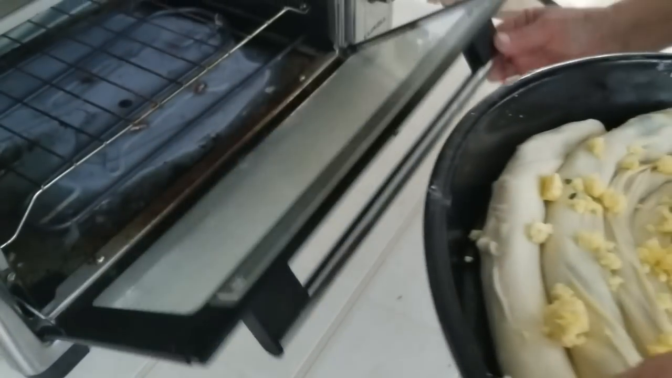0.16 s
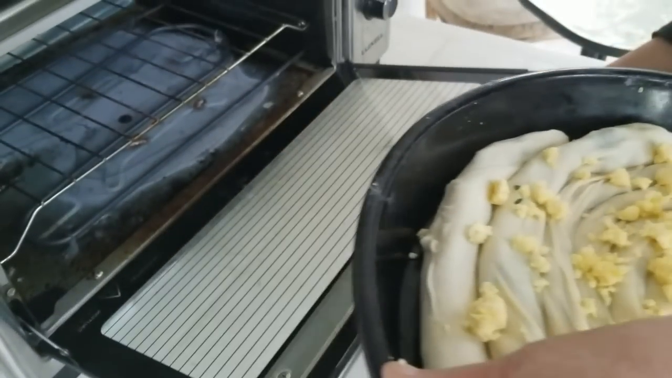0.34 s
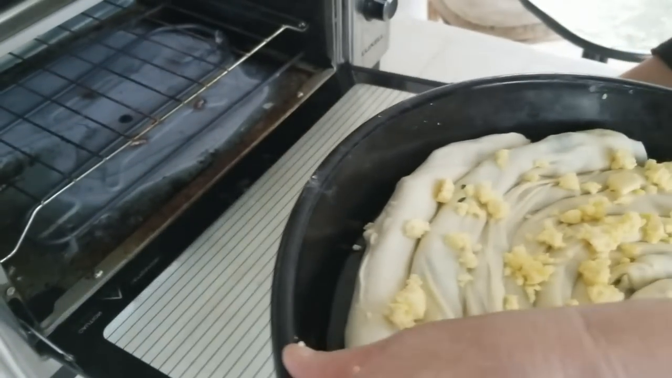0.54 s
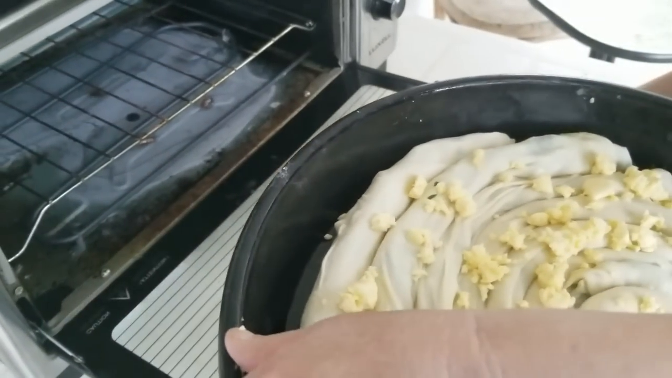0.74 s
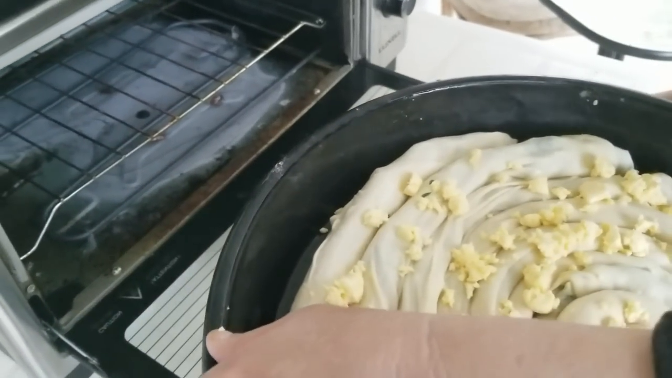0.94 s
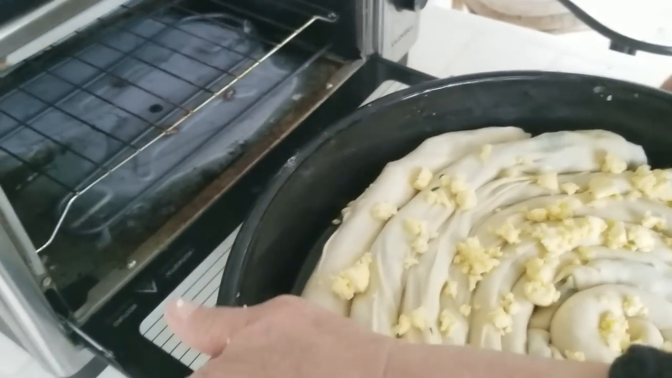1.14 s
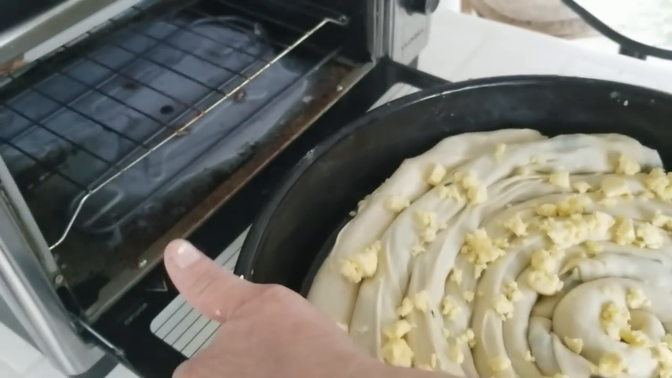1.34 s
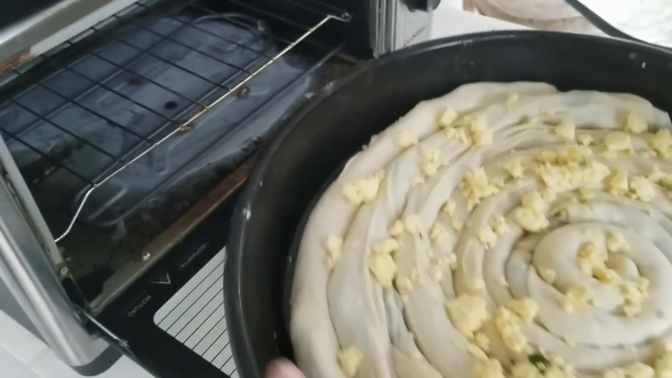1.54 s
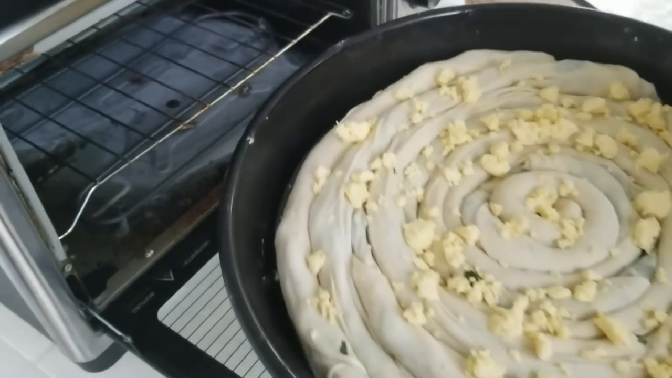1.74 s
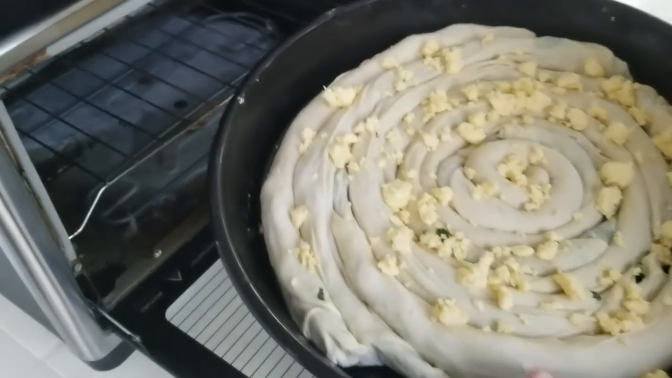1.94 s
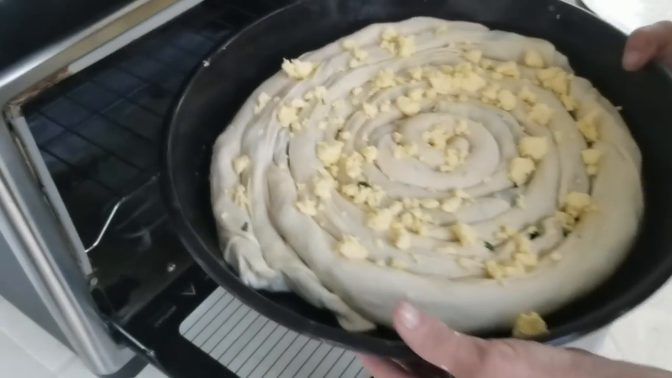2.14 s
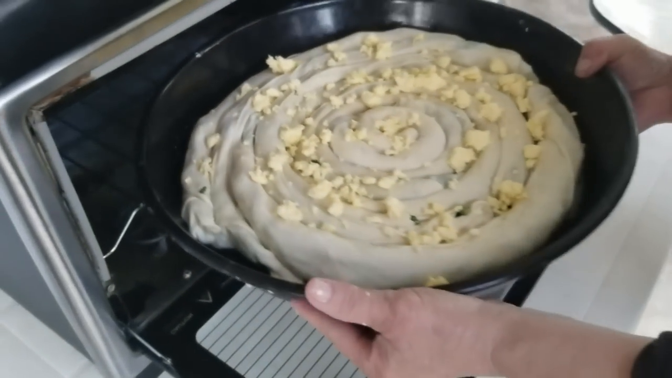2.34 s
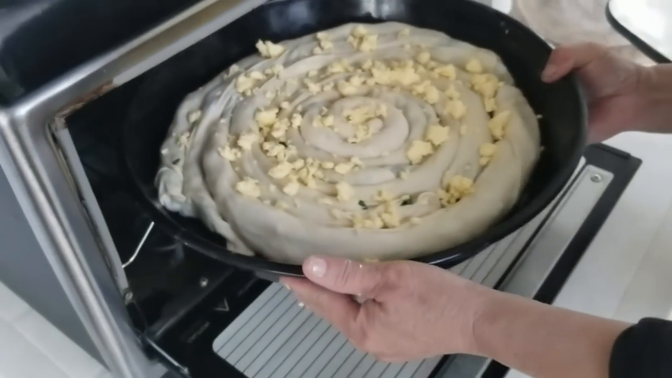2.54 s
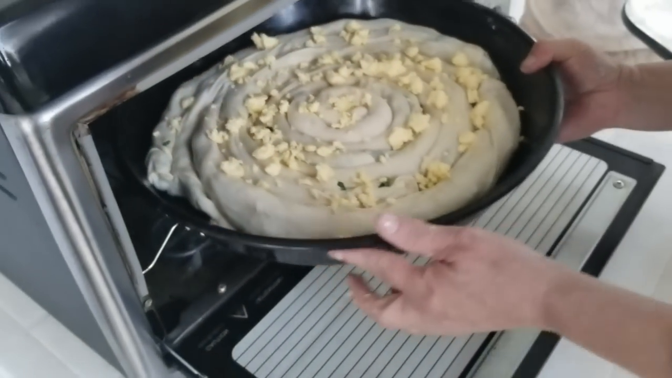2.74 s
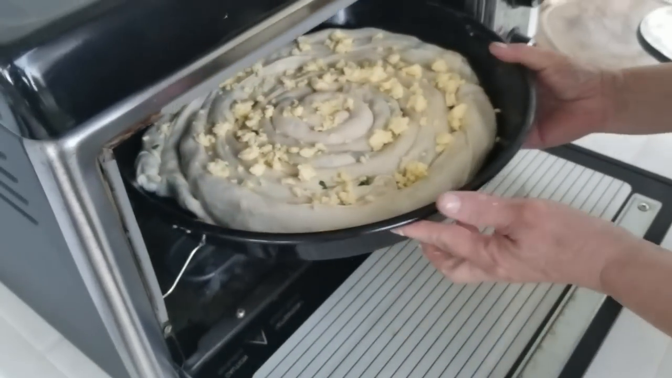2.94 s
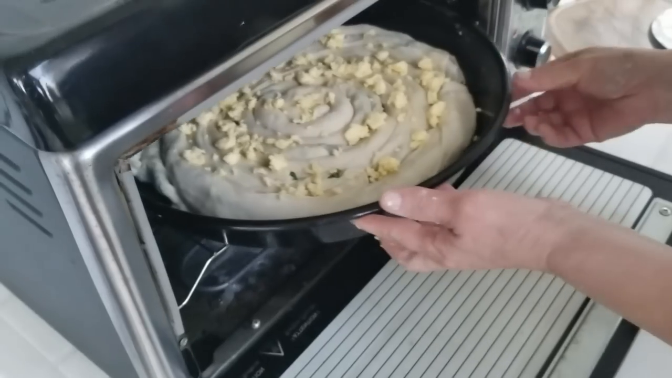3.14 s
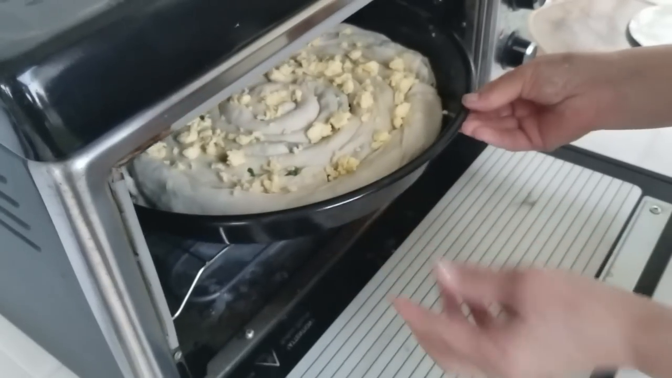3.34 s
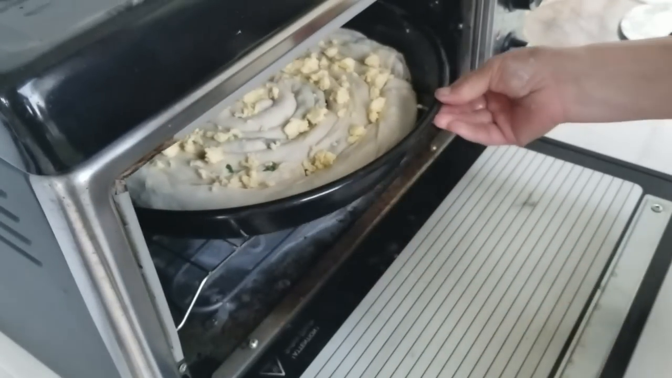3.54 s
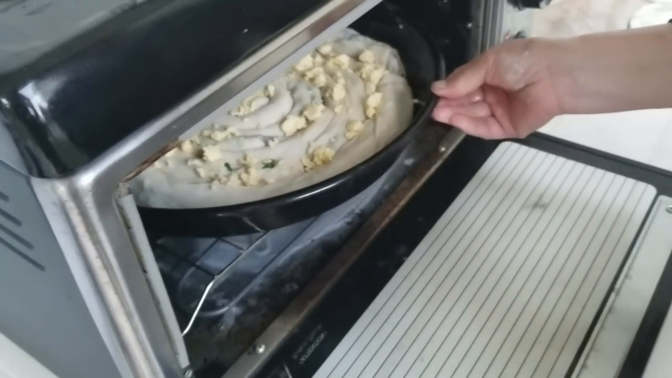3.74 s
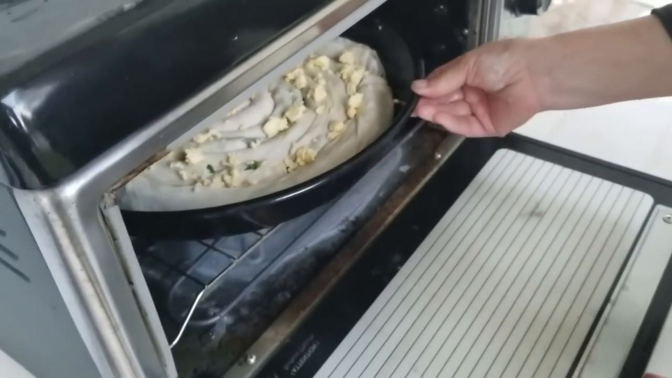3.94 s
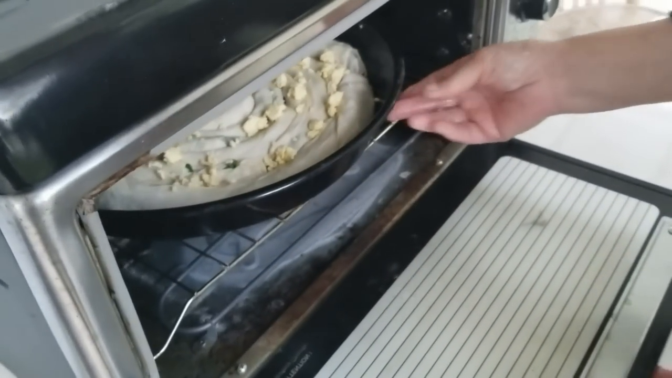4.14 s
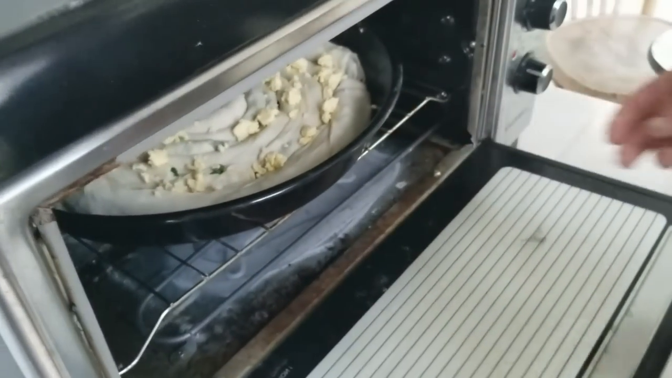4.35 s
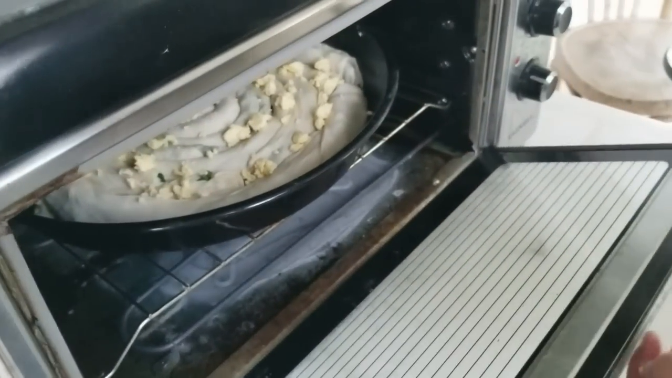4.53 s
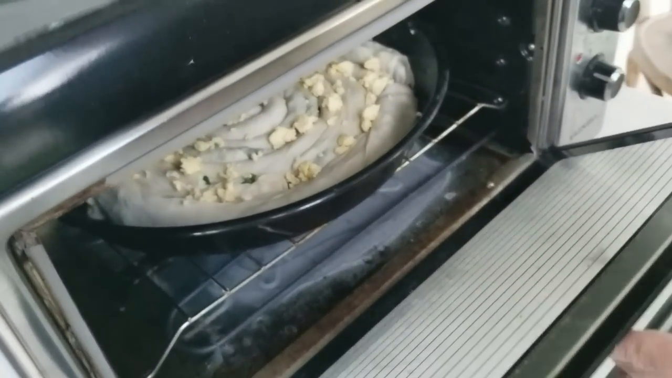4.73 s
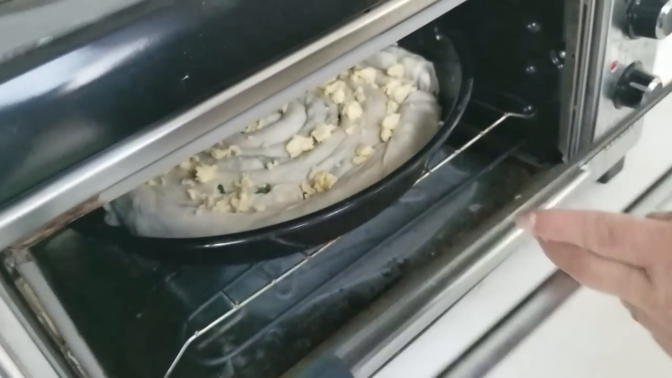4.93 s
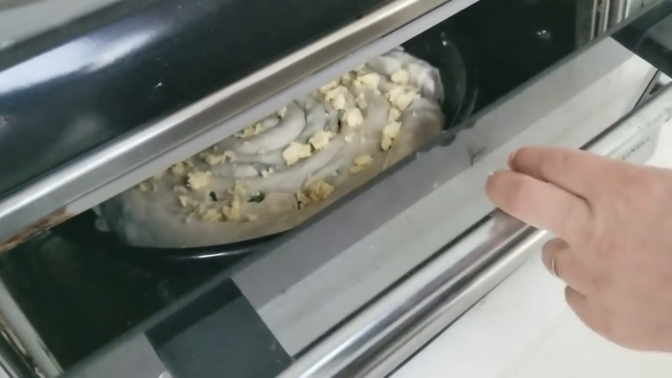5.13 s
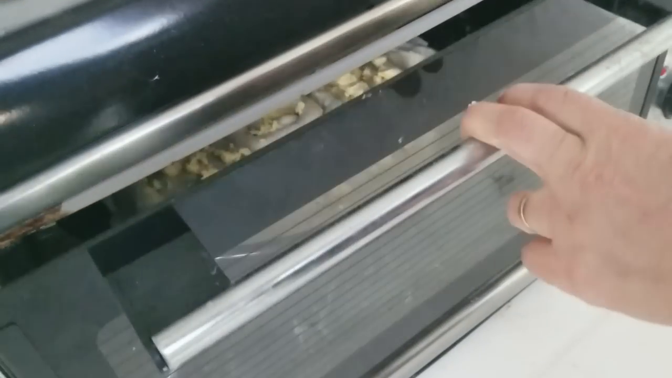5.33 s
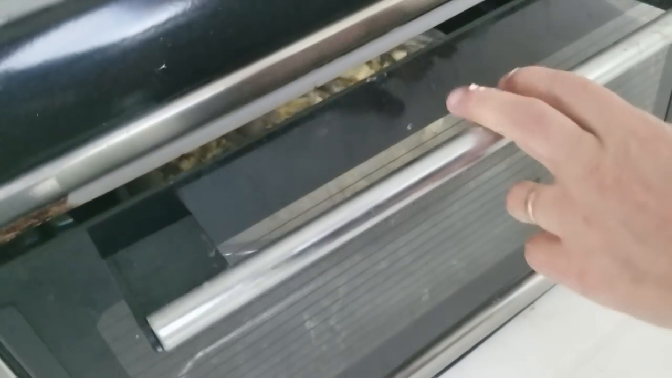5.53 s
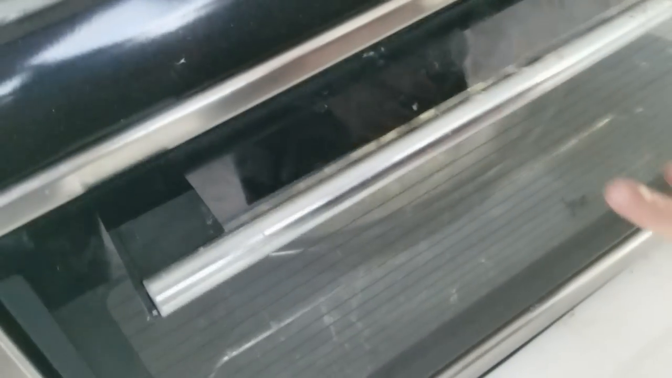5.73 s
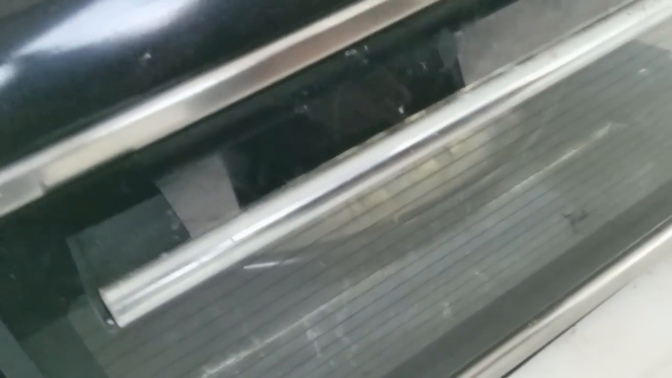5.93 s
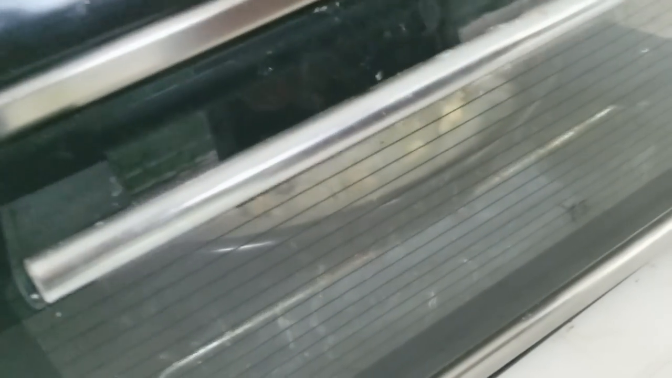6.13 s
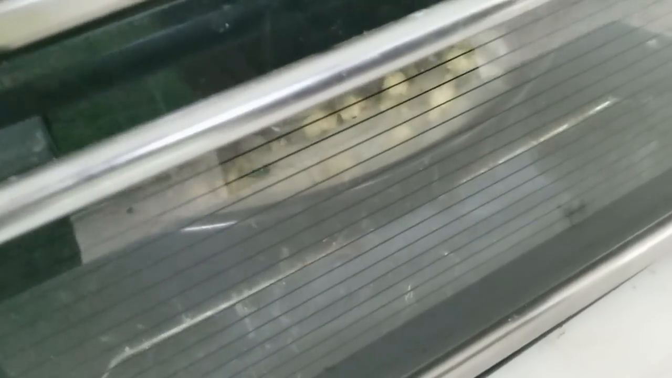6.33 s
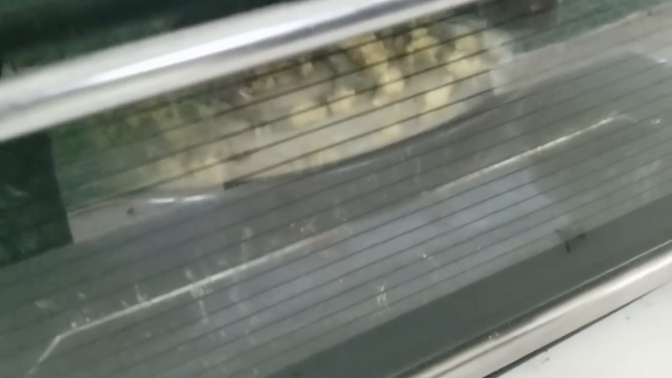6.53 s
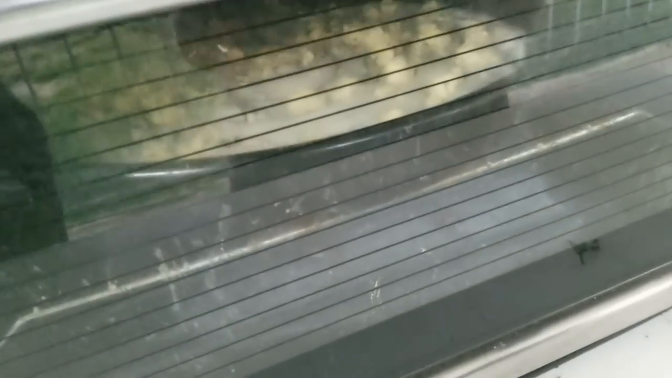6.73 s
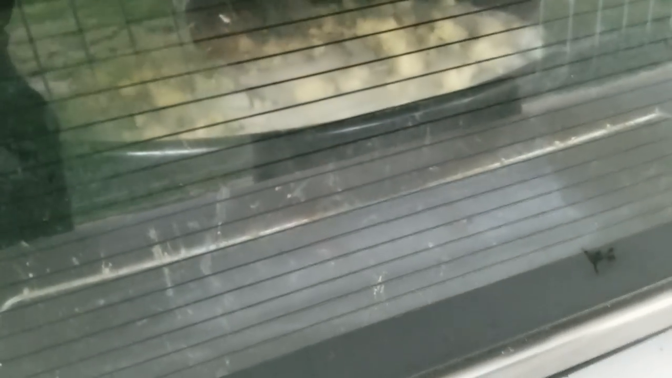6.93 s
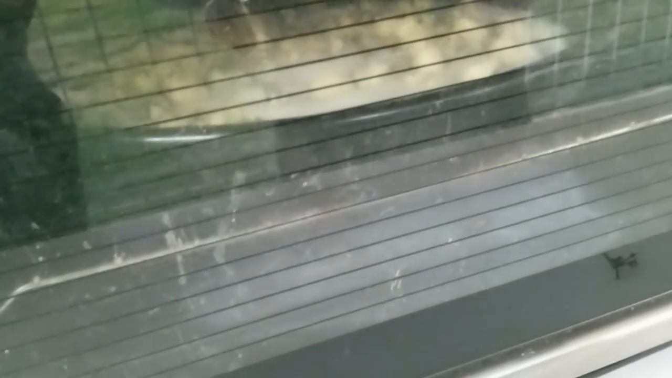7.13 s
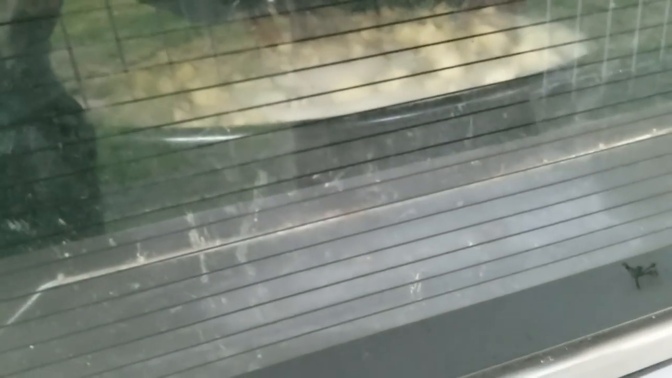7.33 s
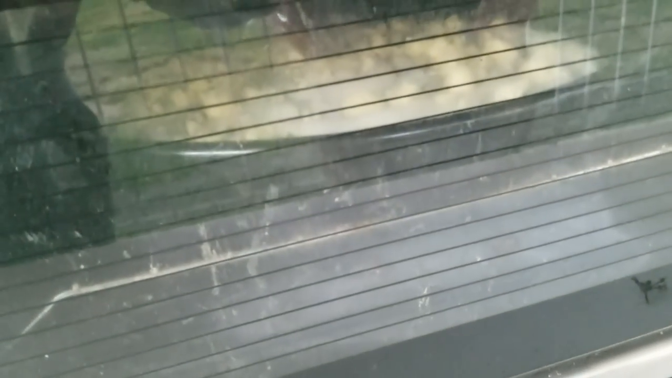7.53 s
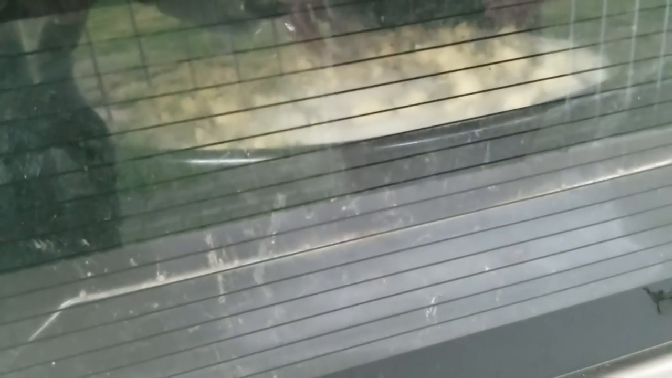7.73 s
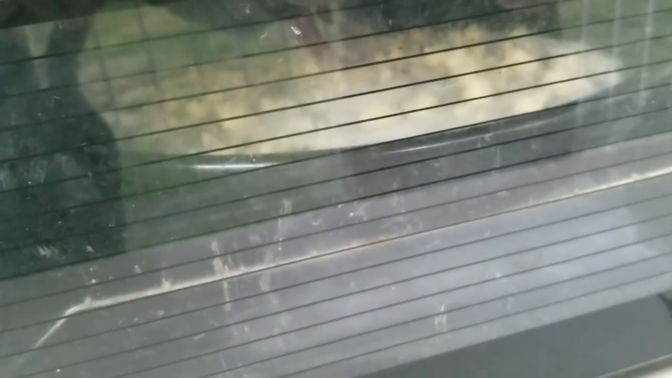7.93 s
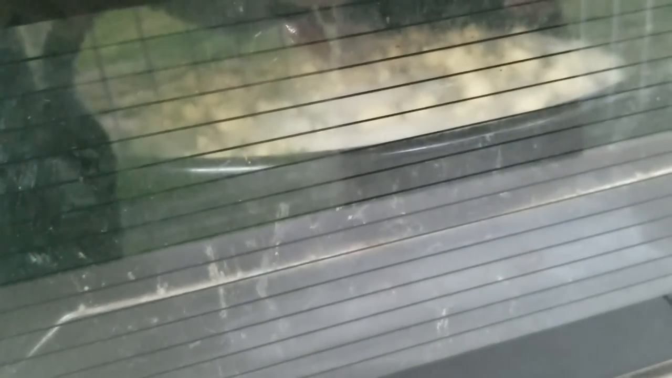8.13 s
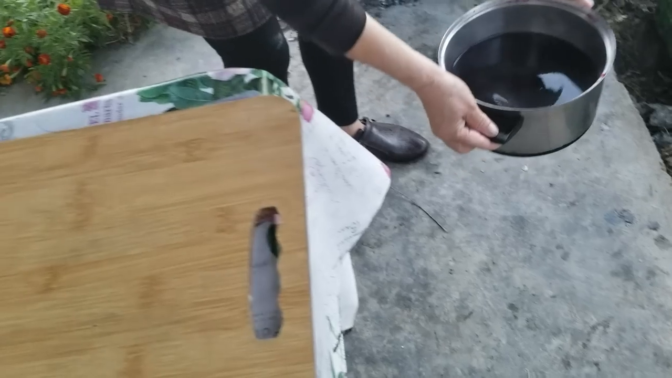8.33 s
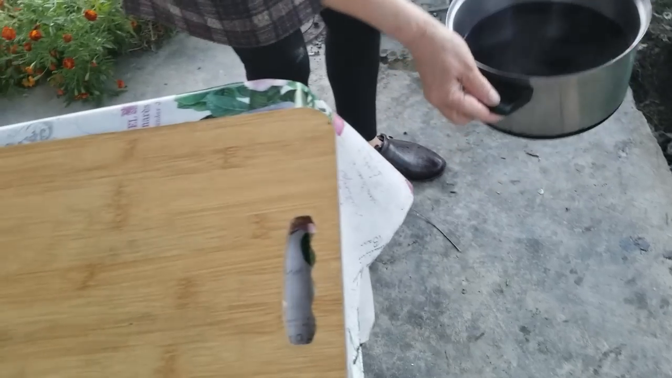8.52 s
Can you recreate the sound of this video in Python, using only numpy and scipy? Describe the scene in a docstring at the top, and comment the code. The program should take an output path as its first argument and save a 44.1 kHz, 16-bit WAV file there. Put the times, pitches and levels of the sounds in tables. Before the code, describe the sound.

An oven door drops open with a metallic rattle, a heavy pan knocks and scrapes onto a wire rack, then the door slams loudly.

```python
"""A small kitchen with a countertop oven, and in the last moment the open air.
The glass door swings down on rubbing hinges and rattles on its stop; a loaded metal pan is set on the
wire rack and pushed in; the door slams shut with one rebound and the casing hums afterwards.
Knocks set off the ringing notes of sheet metal, rubs are streams of tiny slips that keep metal ringing,
and the hum is two close notes over low noise; soft thuds, ticks and far tones fill in."""
import sys
import numpy as np
from scipy import signal
from scipy.fft import rfft, irfft, next_fast_len
from scipy.io import wavfile
from scipy.ndimage import uniform_filter1d

SR = 44100
rng = np.random.default_rng(int(sys.argv[2]) if len(sys.argv) > 2 else 0)


def to_wav(s):
    """Save 16-bit WAV."""
    ch = np.atleast_2d(s).T  # columns
    pcm = np.round(np.clip(ch, -1, 1) * 32767)  # PCM
    wavfile.write(sys.argv[1], SR, pcm.astype(np.int16))


N = 378106  # length in samples

# Door meeting the frame: (time [s], strength [dB], hardness = treble against bass [dB])
SLAM_HITS = [(5.603, -32, -3.5), (5.6067, -10, -2), (5.6245, -19, -19), (5.716, -10.5, -7.5)]
# Notes of the shut door, glass pane and casing: (pitch [Hz], relative level [dB], time to fall 60 dB [s])
SHUT_DOOR_MODES = [(57, -21, .9), (85, -22, .6), (143, -3, .15), (172, 0, .16), (200, -16, .55),
                   (255, -7, .2), (430, -19, .18), (600, -15, .08), (530, -14, .2), (754, -21, .18),
                   (884, -20, .16), (960, -18, .2), (1228, -24, .25), (1624, -25, .22), (1954, -12, .17),
                   (2009, -11, .16), (2072, -16, .15), (2200, -9, .15), (2309, -8, .14), (2408, -13, .12),
                   (2866, -20, .2), (3031, -23, .18), (3187, -20, .18), (4134, -20, .13), (4703, -18, .15),
                   (4996, -11, .08), (5139, -18, .13), (6670, -18, .09)]
# Spectrum of the shut door's weak notes: (frequency [Hz], relative level per Hz [dB])
SHUT_DOOR_COLOUR = [(100, -28), (170, -19), (793, -33.5), (978, -30), (1140, -37), (1730, -34), (1980, -22),
                    (2680, -27.5), (3120, -31), (4200, -33), (5020, -30.5), (5730, -38.5), (6550, -32.5),
                    (8070, -44.5), (11800, -50.5), (16000, -60.5)]
# Left against right for the shut door: (frequency [Hz], left minus right [dB])
SHUT_DOOR_BALANCE = [(60, 4.5), (110, -1.5), (200, -1), (380, -1), (700, -0.5), (1290, 1.0), (2380, 4),
                     (4400, 1), (8120, -2.5), (15000, 4)]


def door_slamming():
    """The spring pulls the glass against the frame; it rebounds once and shivers to rest."""
    weak_t60s = [(200, 0.15), (1000, 0.31), (2500, 0.087), (6000, .13), (12000, 0.1)]  # (Hz, s)
    door = body(SHUT_DOOR_MODES, SHUT_DOOR_COLOUR, SHUT_DOOR_BALANCE, weak_t60s,
                dense_db=-3, crack=1.1, crack_s=.005)
    shiver = bounces(start_s=5.7948, gap_s=.046, first_db=-27, loss_db=4.5, hard_db=-22, count=6)
    return knocks(SLAM_HITS + shiver, door, split_hz=280, chatter=0.65)


# Door landing on its stop: (time [s], strength [dB], hardness = treble against bass [dB])
STOP_HITS = [(0.572, -37, -26), (0.894, -20, 2.5), (0.901, -12.5, -4), (0.915, -26, -23), (0.972, -20, -5),
             (0.993, -20.5, -5), (1.030, -15.5, -22), (1.052, -27, -.5)]
# Notes of the open door on its hinges: (pitch [Hz], relative level [dB], time to fall 60 dB [s])
OPEN_DOOR_MODES = [(56, -27, .7), (74, -22, .5), (126, -11, .2), (141, 0, .2), (184, -7, .17),
                   (214, -4, .17), (286, -13, .14), (312, -13, .14), (390, -13, .16), (556, -17, .2),
                   (738, -24, .22), (838, -23, .2), (1014, -21, .26), (1108, -21, .24), (1222, -24, .22),
                   (1860, -32, .22), (2210, -25, .18), (2640, -26, .18), (2860, -26, .18)]
# Spectrum of the open door's weak notes: (frequency [Hz], relative level per Hz [dB])
OPEN_DOOR_COLOUR = [(150, -20), (250, -1.5), (393, -9.5), (476, -22.5), (557, -12), (640, -16.5),
                    (1200, -17.5), (1720, -26), (2300, -22.5), (2910, -25), (12100, -45), (16000, -46)]
# Left against right for the open door and its hinges: (frequency [Hz], left minus right [dB])
OPEN_DOOR_BALANCE = [(60, -0.3), (180, -1.2), (550, -1.7), (1650, 1.5), (4970, 1.8), (15000, 1.5)]


def door_landing():
    """The opened door bounces on its stop and rattles to rest, each contact ringing its metal."""
    weak_t60s = [(200, .18), (1000, 0.17), (4000, 0.37), (12000, .12)]  # (Hz, s)
    door = body(OPEN_DOOR_MODES, OPEN_DOOR_COLOUR, OPEN_DOOR_BALANCE, weak_t60s,
                dense_db=-6, crack=0.35, crack_s=.004)
    rattle = bounces(start_s=1.083, gap_s=.039, first_db=-25, loss_db=5, hard_db=-5.5, count=6)
    return knocks(STOP_HITS + rattle, door, split_hz=248, chatter=.8)


# Notes of the hinge arm and spring: (pitch [Hz], relative level [dB], time to fall 60 dB [s])
HINGE_MODES = [(220, -8, 0.35), (676, -16, 0.27), (1015, -15, 0.33), (1074, -16, 0.38), (2880, -20, 0.09),
               (3250, -25, 0.11), (4530, -24, .15)]
# Spectrum of the hinge's weak notes: (frequency [Hz], relative level per Hz [dB])
HINGE_COLOUR = [(59, -44.5), (100, -14.5), (202, -0.5), (398, -11), (818, -10), (950, -13.5), (1550, -16),
                (1720, -20), (4570, -14), (8830, -25.5), (16000, -26)]
# Short rubs, first opening, then closing: (start [s], length [s], rumble level [dB], hiss level [dB])
HINGE_RUBS = [(-.03, 0.041, -52, -54.5), (.05, 0.03, -54, -51.5), (.14, 0.14, -59, -63),
              (.46, .04, -63, -66), (.6, .08, -73, -63), (.745, .13, -64, -56), (4.39, .14, -61, -61),
              (4.67, 0.093, -73, -62), (4.95, .2, -75, -71), (4.76, .06, -57, -58),
              (4.84, .045, -54, -53.5), (5.165, .11, -66, -61), (5.5, .09, -70, -68)]
# The arm rings near full stretch: (start [s], length [s], low ring level [dB], high ring level [dB])
HINGE_CREAK = [(.745, .135, -63, -57)]
HINGE_ATTACK_S, HINGE_FADE_DB_PER_S = .035, 110


def hinges():
    """The hinges bind in short rubs as the door opens and closes; the arm creaks near full stretch."""
    strong, crowd = body(HINGE_MODES, HINGE_COLOUR, OPEN_DOOR_BALANCE, [(200, 0.34), (8000, 0.12)],
                         dense_db=5, crack=0, crack_s=.004)
    rub_drive = strokes(HINGE_RUBS, HINGE_ATTACK_S, HINGE_FADE_DB_PER_S)
    rubs = rubbing(rub_drive, [(strong, crowd)], slips_per_s=1700, spread_db=5.0,
                   lowest_hz=90, split_hz=1700)
    creak_drive = strokes(HINGE_CREAK, HINGE_ATTACK_S, HINGE_FADE_DB_PER_S)
    clear_arm = (strong, from_db(-22) * crowd)  # mostly the strong notes
    creak = rubbing(creak_drive, [clear_arm], slips_per_s=900, spread_db=3.0,
                    lowest_hz=1400, split_hz=1700)
    return rubs + creak


# The long push into the oven: (time [s], pressure as rumble level [dB], speed as hiss level [dB])
PAN_PUSH = [(2.85, -50.5, -50.5), (3.008, -54, -49), (3.094, -45.5, -46), (3.188, -49, -47.5),
            (3.314, -50.5, -55), (3.524, -50, -48.5), (3.732, -51.5, -60), (3.796, -50, -55),
            (4.145, -44, -49.5)]
RUMBLE_FADE_DB_PER_S, HISS_FADE_DB_PER_S = 124, 400  # once the pan stops
SCRAPE_ATTACK_S, SCRAPE_FADE_DB_PER_S = .014, 212


def long_push():
    """Rumble and hiss gains of the push; when the pan stops, hiss fades faster than rumble."""
    s, rumble_db, hiss_db = np.transpose(PAN_PUSH)
    start = s[0] - SCRAPE_ATTACK_S
    t = np.arange(N) / SR
    gains = []
    for db, fade in [(rumble_db, RUMBLE_FADE_DB_PER_S), (hiss_db, HISS_FADE_DB_PER_S)]:
        shape = envelope(start, s[-1] - start, SCRAPE_ATTACK_S, fade)
        gains.append(from_db(np.interp(t, s, db)) * shape)
    return np.array(gains)


# Pan knocking on the rack: (time [s], strength [dB], hardness = treble against bass [dB])
PAN_HITS = [(2.4127, -46.5, -0.5), (2.424, -33, -17), (2.478, -38.5, -21), (2.6067, -40.5, 13.5),
            (2.628, -31.5, -14), (2.6995, -31.5, -2.5), (2.722, -47.5, 8.5), (3.1595, -51, 12),
            (3.9108, -60, 7), (4.1418, -57, 4), (4.279, -50, -25), (4.34, -52, -33)]
# Notes of the loaded pan on the wire rack: (pitch [Hz], relative level [dB], time to fall 60 dB [s])
PAN_MODES = [(68, -22, 0.12), (145.2, -6, 0.4), (210.7, -3, 0.16), (293.4, -11, 0.47), (565, -18.5, 0.24),
             (715, -11.5, 0.15), (802, -14, 0.22), (1140, -15.5, 0.31), (1400, -19, 0.32),
             (1750, -24, 0.18), (1960, -29, 0.19), (2360, -14.5, 0.19), (2840, -19.5, 0.24),
             (4360, -15.5, 0.17), (6200, -18, 0.18)]
# Spectrum of the pan's weak notes: (frequency [Hz], relative level per Hz [dB])
PAN_COLOUR = [(29, -54.5), (50, -8), (145, -0.5), (291, -5), (398, -10), (586, -6), (646, -12), (746, -7.5),
              (905, -19), (997, -13), (2160, -19.5), (4670, -18), (8540, -25), (12600, -29), (16000, -34)]
# Left against right for the pan: (frequency [Hz], left minus right [dB])
PAN_BALANCE = [(60, -7), (150, 1), (380, -4), (950, -1.5), (2380, 3.5), (5980, -3.5), (15000, -0.5)]
# Scrapes as the pan settles, before the mix: (start [s], length [s], rumble level [dB], hiss level [dB])
PAN_SCRAPES = [(2.404, .045, -44, -44), (2.47, 0.028, -46.5, -48.5), (2.53, 0.075, -53, -57),
               (2.604, 0.02, -38, -35.5), (2.70, .06, -46, -45), (2.765, .05, -43.5, -42.5)]
# Fingers sliding on the rim, before the mix: (start [s], length [s], rumble level [dB], hiss level [dB])
GRIPS = [(1.30, .15, -67, -58), (1.69, 0.11, -63.5, -60), (2.24, .16, -77, -66), (4.22, .14, -72, -67)]
GRIP_ATTACK_S, GRIP_FADE_DB_PER_S = 0.06, 85
CATCH_DB, CATCH_HZ = .9, 18  # the pan catches and frees itself: typical depth, fastest change


def pan_on_rack():
    """A hand shifts its grip on the pan, which knocks on the wires and scrapes along three of them."""
    weak_t60s = [(150, 0.29), (1000, 0.33), (5000, .28), (12000, 0.15)]  # (Hz, s)
    spots = [body(PAN_MODES, PAN_COLOUR, PAN_BALANCE, weak_t60s, dense_db=0, crack=0.82, crack_s=0.0033)
             for wire in range(3)]
    grip_drive = strokes(GRIPS, GRIP_ATTACK_S, GRIP_FADE_DB_PER_S)
    hand = rubbing(grip_drive, spots[:1], slips_per_s=2100, spread_db=4.0, lowest_hz=219, split_hz=2800)
    sliding = strokes(PAN_SCRAPES, SCRAPE_ATTACK_S, SCRAPE_FADE_DB_PER_S) + long_push()
    catching = from_db(CATCH_DB * rms_one(cut(rng.standard_normal(N), CATCH_HZ, "low")))
    scrape = rubbing(catching * sliding, spots, slips_per_s=700, spread_db=3.5,
                     lowest_hz=35, split_hz=916, wander_db=5.5)
    landing = knocks(PAN_HITS, spots[0], split_hz=970, chatter=0.97)
    return landing + from_db(0.8) * scrape + from_db(-1.5) * hand


# Light metal ticks: (time [s], strength [dB], centre pitch [Hz], left minus right [dB])
TICKS = [(0.24, -36, 5600, -0.5), (0.3105, -55, 3200, 9), (0.4873, -59, 4550, 10), (1.9839, -49, 7520, 1.5),
         (2.0288, -49, 5450, -0.5), (2.03, -52.5, 3420, -1), (4.1418, -53, 5600, -3),
         (4.4, -43.5, 7440, -4.5), (5.7948, -45, 6640, 2.5), (5.8546, -50, 5000, 2)]


def ticks():
    """Small metal contacts: short noise bursts, each strongest around its own pitch."""
    out, t = np.zeros((2, N)), np.arange(SR // 4) / SR
    fade = np.exp(-t / 0.0032) + 0.3 * np.exp(-t / 0.024)
    for s, db, hz, side_db in TICKS:
        colour = [(hz / 10, -30), (hz / 2, -15), (hz, 0), (hz * 2, -14)]
        add(out, s, from_db(db) * panned(side_db) * noise(colour, size=len(t)) * fade)
    return out


# Dull knocks and puffs: (time [s], level before shaping [dB], centre pitch [Hz])
THUDS = [(2.619, -39, 65), (4.17, -43.5, 60.3), (4.531, -52.5, 60), (6.94, -57, 241), (7.521, -57, 50),
         (8.0, -60.5, 142.1), (8.414, -40.5, 89)]


def thuds():
    """Soft, dull knocks: low noise that swells and fades."""
    out, t = np.zeros((2, N)), np.arange(SR // 2) / SR
    shape = (1 - np.exp(-t / 0.0039)) * np.exp(-t / 0.048)
    for s, db, hz in THUDS:
        colour = [(hz / 4, -8), (hz, 0), (hz * 3.1, -15), (hz * 10, -42), (hz * 40, -75)]
        add(out, s, from_db(db) * noise(colour, size=len(t)) * shape)
    return out


BUMP_S, BUMP_DB = 6.4718, -31.5  # time, strength before filtering and panning


def bump():
    """A touch on the microphone's housing: a faint tick and one heavily damped low swing."""
    out, t = np.zeros((2, N)), np.arange(SR // 8) / SR
    swing = np.cos(2 * np.pi * 110 * t) * np.exp(-t / 0.0021)
    tick = 0.13 * cut(rng.standard_normal((2, len(t))) * np.exp(-t / .003), 6800, "high")
    add(out, BUMP_S, from_db(BUMP_DB) * panned(-25) * (cut(swing, 1040, "low") + tick))
    return out


# Spectrum of the casing's dull rumble: (frequency [Hz], relative level per Hz [dB])
RUMBLE_COLOUR = [(18, -49), (30, -20.5), (81, -2), (113, -5), (177, -19.5), (295, -20), (407, -35.5),
                 (475, -30), (1200, -41), (1560, -74), (2640, -120)]
HUM_START_S, HUM_HOLD_S, HUM_FADE_DB_PER_S = 5.716, 1.1, 18
HUM_HZ, BEAT_HZ = 111.7, 5.41
HUM_DB, SECOND_NOTE_DB, RUMBLE_DB = -57, -8.5, -63  # the second note is relative to the first
BOOM_DB, BOOM_FADE_DB_PER_S = -40, 55  # the first, quickly dying part of the rumble


def casing():
    """The shut oven rings on two close low notes that beat, over a dull rumble."""
    t = np.arange(N) / SR - HUM_START_S
    first_note = np.sin(2 * np.pi * HUM_HZ * t)
    second_note = from_db(SECOND_NOTE_DB) * np.sin(2 * np.pi * (HUM_HZ - BEAT_HZ) * t)
    ringing = envelope(HUM_START_S, HUM_HOLD_S, .03, HUM_FADE_DB_PER_S)
    boom = from_db(BOOM_DB) * envelope(HUM_START_S, 0, .03, BOOM_FADE_DB_PER_S)
    hum = from_db(HUM_DB) * ringing * np.sqrt(2) * (first_note + second_note)
    return hum + (boom + from_db(RUMBLE_DB) * ringing) * noise(RUMBLE_COLOUR)


# Faint far tones: (start [s], length of the swell [s], pitch [Hz], peak level [dB])
FAR_TONES = [(1.77, 0.071, 660, -58.5), (2.264, 0.02, 668, -60.5), (7.355, 0.025, 1800, -72.5),
             (8.15, 0.036, 1830, -75.5)]


def far_tones():
    """Soft sine tones from far away, slightly unsteady in pitch, that swell and fade."""
    out, t = np.zeros((2, N)), np.arange(SR // 2) / SR
    for s, length, hz, db in FAR_TONES:
        rise = 2 * t / length  # the peak comes at half the length
        waver = rms_one(cut(rng.standard_normal(len(t)), 40, "low"))
        tone = np.sin(2 * np.pi * np.cumsum(hz * (1 + 0.022 * waver)) / SR)
        add(out, s, from_db(db) * rise * np.exp(1 - rise) * tone)
    return out


# Spectrum of the kitchen's echo: (frequency [Hz], relative level per Hz [dB])
KITCHEN_COLOUR = [(60, -1), (300, 0), (1300, 0.5), (2200, -10), (3300, -5.5), (7000, -3), (15000, -2)]
# How long the echo lasts: (frequency [Hz], time to fall 60 dB [s])
KITCHEN_T60 = [(60, .9), (200, 0.74), (1000, 0.22), (5000, 0.7), (14000, 0.47)]


def kitchen(x):
    """Diffuse echo of hard walls, arriving a little late: the sound is smeared by dying noise."""
    tail = dying(noise(KITCHEN_COLOUR, size=SR), KITCHEN_T60)
    tail = tail * np.clip((np.arange(SR) / SR - .008) / .02, 0, 1)
    return convolve(x, tail / np.sqrt(np.sum(tail ** 2) / 2))


# Spectrum of the quiet kitchen: (frequency [Hz], relative level per Hz [dB])
QUIET_COLOUR = [(15, -35), (25, -7), (108, -5.5), (157, -10.5), (175, -19.5), (394, -20.5), (545, -28),
                (677, -26.5), (1560, -29.5), (1840, -25), (2550, -27.5), (5730, -21), (9070, -32),
                (11300, -23.5), (16000, -31)]


def quiet_kitchen():
    """The kitchen's faint, steady background noise."""
    return from_db(-68) * noise(QUIET_COLOUR)


# Spectrum of the open air: (frequency [Hz], relative level per Hz [dB])
OUTDOORS_COLOUR = [(30, -12.5), (60, -3), (90, 2), (160, -7.5), (280, 0), (360, -22.5), (450, -14.5),
                   (560, -31.5), (1400, -42.5), (2200, -36.5), (2950, -21.5), (4200, -33.5), (6200, -23),
                   (8000, -48.5), (11000, -34.5), (15500, -39.5)]
OUTDOORS_S, OUTDOORS_DB = 8.268, -47  # time the open air takes over, level


def open_air():
    """Steady noise of the open air."""
    return from_db(OUTDOORS_DB) * noise(OUTDOORS_COLOUR)


def body(modes, colour, balance, t60s, dense_db, crack, crack_s):
    """Ring of metal: a few strong notes, and a dense crowd of weak ones with a crack at the front."""
    t, strong = np.arange(SR * 2 // 3) / SR, 0
    for hz, db, t60 in modes:
        # notes whose pitch is less alike on the two sides reach them out of step
        apart = np.arccos(np.clip(at_hz(LIKENESS, hz), -1, 1)) / 2 * rng.choice([-1, 1])
        wave = np.sin(2 * np.pi * hz * t + apart * np.array([[1], [-1]]))
        wave = wave * (1 - np.exp(-2 * hz * t)) * np.exp(-np.log(1000) * t / t60)
        strong = strong + from_db(db) * panned(at_hz(balance, hz)) * wave
    crowd = from_db(dense_db) * dying(noise(colour, balance, size=len(t)), t60s)
    return strong, crowd * (1 + crack * np.exp(-t / crack_s))


def knocks(hits, struck, split_hz, chatter):
    """Each contact is a bass push and a treble tap; random grit stirs the weak notes anew each time."""
    strong, crowd = struck
    push, tap, grit = np.zeros((3, N))
    t = np.arange(SR // 100) / SR
    for s, db, hard_db in hits:
        burst = rng.standard_normal(len(t)) * np.exp(-t / .002)
        add(push, s, from_db([db]))
        add(tap, s, from_db([db + hard_db]))
        add(grit, s, from_db(db + hard_db) * chatter * burst / np.linalg.norm(burst))
    force = cut(push, split_hz, "low") - cut(tap, split_hz, "high")
    gritty_force = force + cut(grit, split_hz, "high")
    return convolve(force, strong) + convolve(gritty_force, crowd) / np.hypot(1, chatter)


def bounces(start_s, gap_s, first_db, loss_db, hard_db, count):
    """A run of evenly spaced contacts, each weaker than the one before."""
    return [(start_s + k * gap_s, first_db - k * loss_db, hard_db) for k in range(count)]


def rubbing(drive, spots, slips_per_s, spread_db, lowest_hz, split_hz, wander_db=7.0):
    """Tiny slips keep a body ringing as the load wanders; pressure feeds the rumble, speed the hiss."""
    rumble, hiss = drive
    ringing = 0
    for strong, crowd in spots:
        wander = np.interp(np.arange(N) * 9 / SR, np.arange(100), rng.standard_normal(100))
        load = from_db(wander_db * wander)
        at, slips = np.flatnonzero(rng.random(N) < slips_per_s / SR), np.zeros(N)
        sizes, signs = rng.exponential(1, N)[at], rng.choice([-1, 1], N)[at]
        slips[at] = signs * from_db(spread_db * np.minimum(sizes, 4))
        ringing = ringing + convolve(load * slips, strong + crowd)
    ringing = cut(ringing, lowest_hz, "high")
    # the total load stays even
    power = uniform_filter1d(np.mean(ringing ** 2, axis=0), size=SR // 12)
    ringing = ringing / np.sqrt(power + 1e-9)
    low = rms_one(cut(ringing, split_hz, "low", order=3))
    high = rms_one(cut(ringing, split_hz, "high", order=3))
    return rumble * low + hiss * high


def strokes(rows, attack_s, fade_db_per_s):
    """Rumble and hiss gains of a series of rubs that share one shape."""
    power = 0
    for s, length, rumble_db, hiss_db in rows:
        shape = envelope(s, length, attack_s, fade_db_per_s)
        power = power + (from_db([[rumble_db], [hiss_db]]) * shape) ** 2
    return np.sqrt(power)


def envelope(start_s, length_s, attack_s, fade_db_per_s):
    """Rise, hold to the end of the length, then fade evenly in dB."""
    t = np.arange(N) / SR - start_s
    fade_db = np.minimum(fade_db_per_s * np.maximum(t - length_s, 0), 200)
    return np.clip(t / attack_s, 0, 1) * from_db(-fade_db)


# How alike the two channels are: (frequency [Hz], left-right correlation [-1 to 1])
LIKENESS = [(50, 0.91), (140, 1), (300, 0.86), (650, .7), (1300, 0.062), (2200, 0.017), (7000, .08),
            (15000, 0)]
# Usual left against right: (frequency [Hz], left minus right [dB])
CENTRED = [(100, -1.5), (10000, -3)]


def noise(colour, balance=CENTRED, size=N):
    """Stereo noise of a given spectrum, most alike in both channels in the bass; rms 1."""
    padded = next_fast_len(size)
    hz = np.arange(padded // 2 + 1) * SR / padded
    mid, side = rfft(rng.standard_normal((2, padded)))
    alike = np.clip(at_hz(LIKENESS, hz), -1, 1)
    both = np.sqrt(1 + alike) * mid + np.sqrt(1 - alike) * side * [[1], [-1]]
    shaped = both * from_db(at_hz(colour, hz)) * panned(at_hz(balance, hz))
    return rms_one(irfft(shaped, padded)[:, :size])


def dying(source, t60s):
    """Let every octave of a noise swell for about half a cycle and die at its own rate."""
    size = source.shape[1]
    t, spectrum = np.arange(size) / SR, rfft(source)
    octave = np.clip(np.log2(np.arange(size // 2 + 1) * SR / size + 1), 6, 14)
    out = 0
    for k in range(6, 15):  # octaves centred on 2 ** k Hz
        band = irfft(spectrum * np.maximum(1 - abs(octave - k), 0), size)
        decay = np.exp(-np.log(1000) * t / at_hz(t60s, 2 ** k))
        out = out + band * decay * (1 - np.exp(-2 * 2 ** k * t))
    return out


def from_db(db):
    """Decibels to gain."""
    return 10 ** (np.asarray(db) / 20)


def rms_one(x):
    """Scale to unit power."""
    return x / np.sqrt(np.mean(x ** 2) + 1e-20)


def at_hz(points, hz):
    """Read a table along log frequency."""
    knots, values = np.transpose(points)
    return np.interp(np.log(np.maximum(hz, 1)), np.log(knots), values)


def cut(x, hz, kind, order=2):
    """Keep the lows or the highs with a Butterworth filter."""
    sos = signal.butter(order, np.clip(hz, 10, .45 * SR), kind, fs=SR, output="sos")
    return signal.sosfilt(sos, x + 1e-18)


def convolve(x, response):
    """Play a signal through a stereo response."""
    return signal.oaconvolve(np.atleast_2d(x), response, axes=1)[:, :N]


def add(out, s, sound):
    """Mix a sound in at a time."""
    start = max(round(s * SR), 0)
    out[..., start:start + sound.shape[-1]] += sound[..., :N - start]


def panned(left_right_db):
    """Gains of the two channels."""
    return from_db(np.array([[.5], [-.5]]) * left_right_db)


def scene():
    """Oven and pan in the kitchen, then the open air; the thuds lie over both."""
    door = door_slamming() + door_landing() + hinges()
    near = door + pan_on_rack() + ticks()
    echo = from_db(-16) * kitchen(near)
    indoors = near + echo + bump() + casing() + far_tones() + quiet_kitchen()
    outside = np.clip((np.arange(N) / SR - OUTDOORS_S) / 0.0034, 0, 1)
    return (1 - outside) * indoors + outside * open_air() + thuds()


def record(dry, dip_hz=8900, dip_q=3.2, dip_depth=.65, bass_cut_hz=36, top_cut_hz=15900):
    """The microphone loses deep bass and some upper treble; peaks are rounded and the top is cut."""
    notched = signal.lfilter(*signal.iirnotch(dip_hz, dip_q, fs=SR), dry)
    dipped = dry + dip_depth * (notched - dry)
    rounded = np.tanh(cut(dipped, bass_cut_hz, "high", order=3))
    top_cut = signal.ellip(10, .2, 80, top_cut_hz, fs=SR, output="sos")
    return signal.sosfilt(top_cut, rounded)


dry = scene()
out = record(dry)
to_wav(out)
```